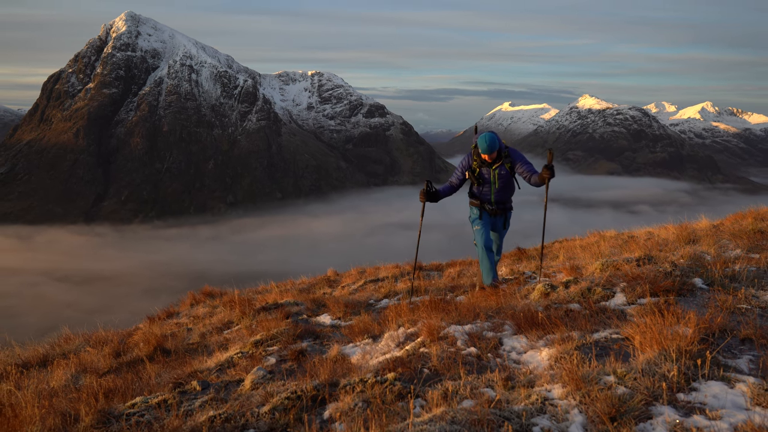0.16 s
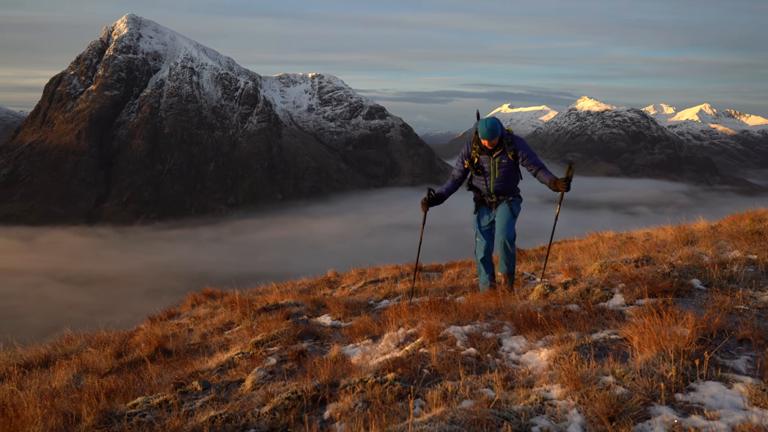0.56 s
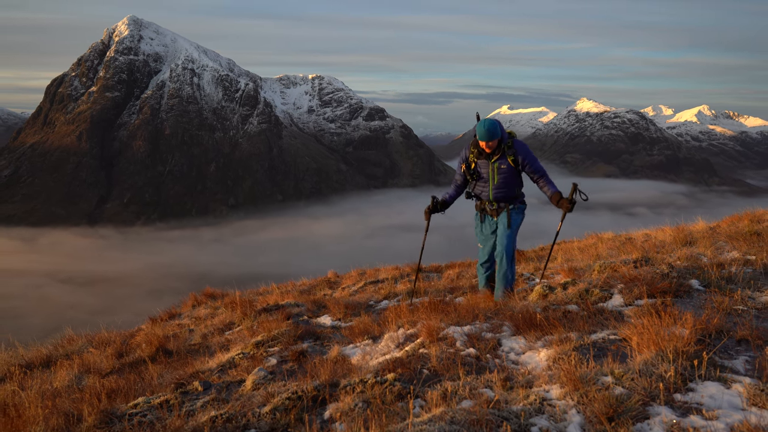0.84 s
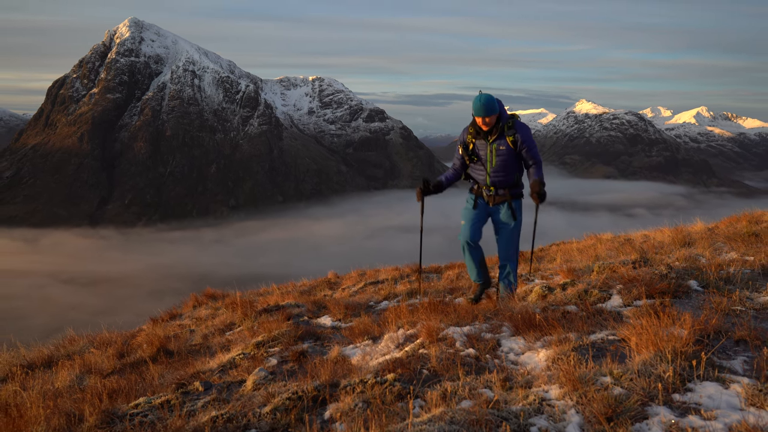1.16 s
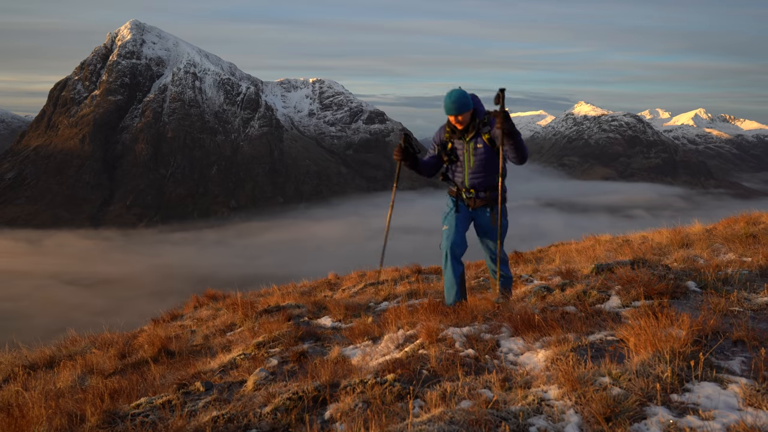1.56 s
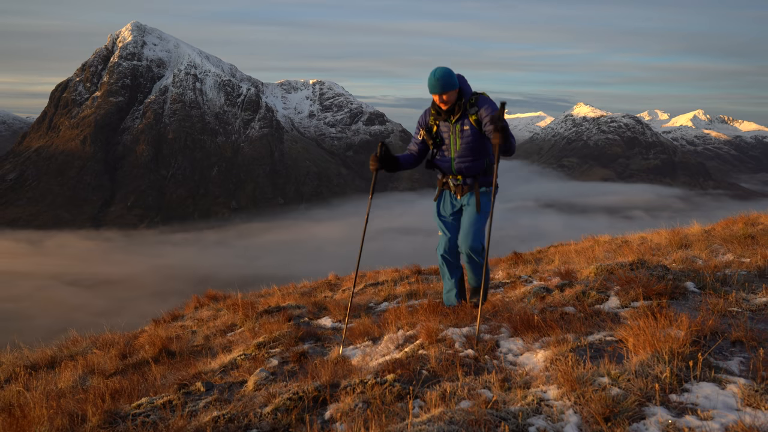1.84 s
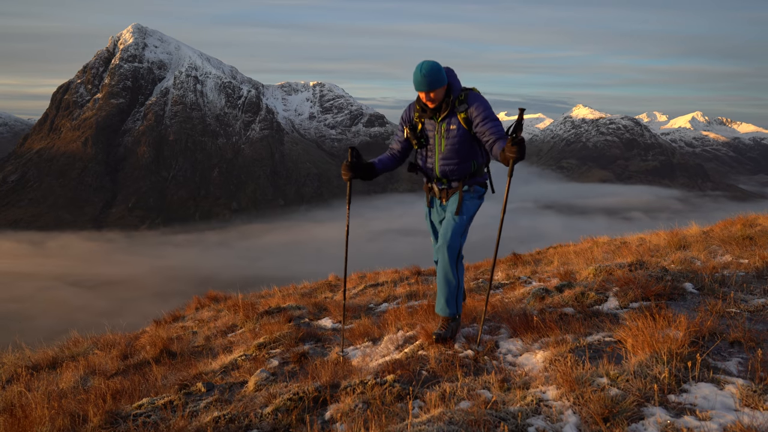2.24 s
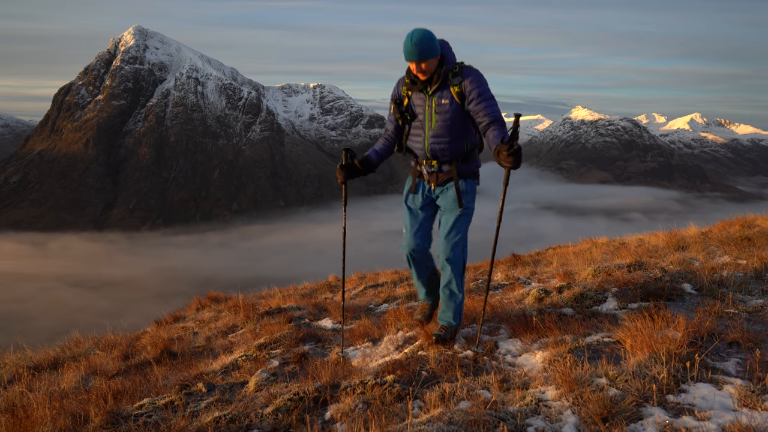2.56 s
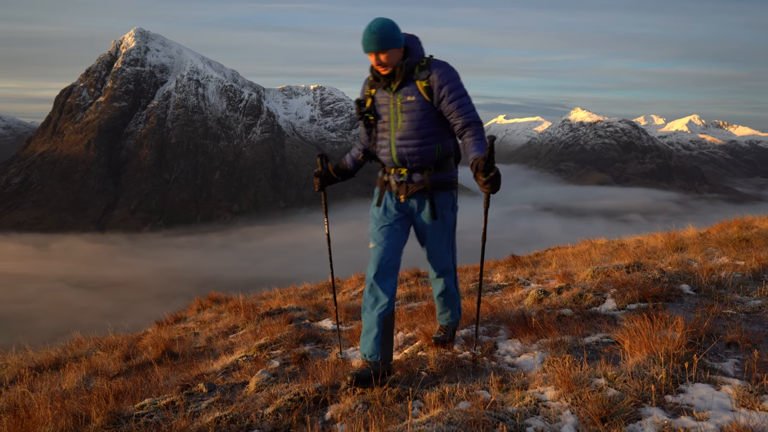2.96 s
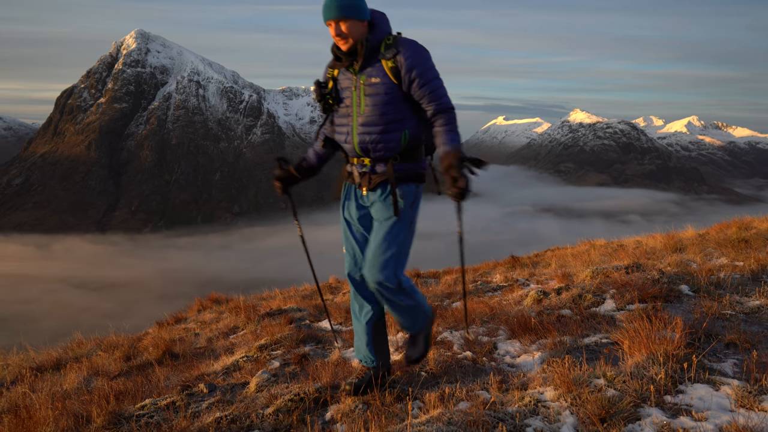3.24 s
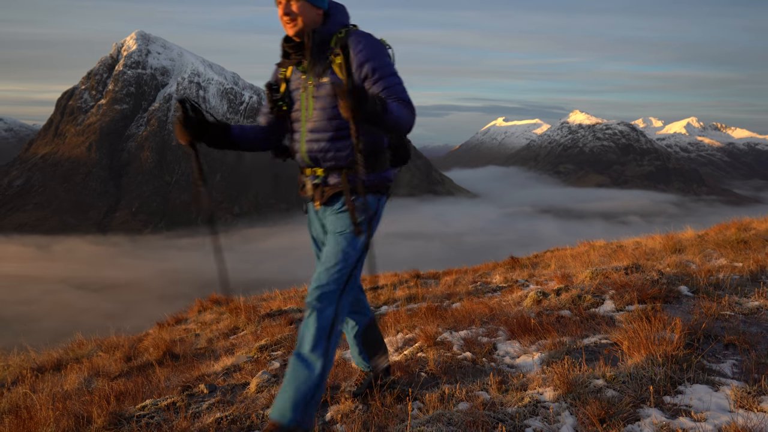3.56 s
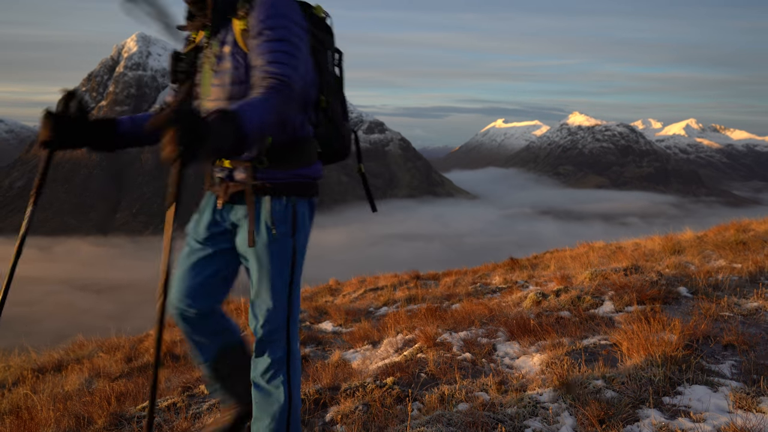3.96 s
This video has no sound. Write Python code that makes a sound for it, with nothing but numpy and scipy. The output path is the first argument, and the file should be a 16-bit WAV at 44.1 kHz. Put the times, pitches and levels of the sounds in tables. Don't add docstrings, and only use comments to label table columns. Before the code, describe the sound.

A hiker nears through brittle, icy grass with crunches, cracks and swishes, while low camera-handling rumble and creaks build to a bump and sharp ticks.

```python
import sys
import numpy as np
from scipy import signal
from scipy.fft import rfft, irfft, next_fast_len
from scipy.io import wavfile
from scipy.ndimage import map_coordinates

SR = 44100
rng = np.random.default_rng(int(sys.argv[2]) if len(sys.argv) > 2 else 0)


def makeup_ratio(level_db):
    decades = np.asarray(level_db, float) / 20
    return 10 ** decades


def transcribe(u):
    v = np.clip(np.atleast_2d(u).T, -1, 1)
    q = np.round(v * 32767).astype(np.int16)
    wavfile.write(sys.argv[1], SR, q)


N = 180501
TIME_S = np.arange(N) / SR
LEFT_RIGHT = np.array([[1], [-1]])


def unit(x):
    return x / np.sqrt(np.mean(x ** 2) + 1e-20)


def peak(x):
    return x / np.abs(x).max(axis=-1, keepdims=True)


def along(points, hz):
    f, v = np.transpose(points)
    return np.interp(np.log(hz + 1), np.log(f + 1), v)


def wobble(rate_hz):
    knots = rng.standard_normal(int(N * rate_hz / SR) + 4)
    return map_coordinates(knots, [np.arange(N) * rate_hz / SR])


def swells(rows):
    s, db, rise_s, fall_s = np.transpose(rows)[..., None]
    t = TIME_S - s
    below_db = 10 * np.where(t < 0, -t / rise_s, t / fall_s)
    return np.sqrt(np.sum(makeup_ratio(db - below_db) ** 2, axis=0))


def filtered(x, response):
    m = next_fast_len(x.shape[-1] + 4096)
    spectrum = rfft(x, m) * response(np.fft.rfftfreq(m, 1 / SR))
    return irfft(spectrum, m)[..., :x.shape[-1]]


def modes(rows):
    def response(f):
        total = 0
        for k, (hz, width, db) in enumerate(rows):
            total = total + (-1) ** k * makeup_ratio(db) * 1j * f * width / (hz * hz - f * f + 1j * f * width)
        return total
    return response


def grit(size, spike_db):
    return rng.standard_normal(size) * makeup_ratio(spike_db * np.minimum(rng.exponential(size=size), 4))


def burst(length_s, fade_s, spike_db):
    t = np.arange(SR // 16) / SR
    onset = 1 - np.exp(-t / 0.00077)
    decay = np.exp(-.5 * t / length_s - np.maximum(t - length_s, 0) / fade_s)
    return grit((3, len(t)), spike_db) * onset * decay


def struck(response):
    blow = np.zeros((3, SR // 16))
    blow[:, 8] = 1
    return peak(filtered(blow, response))


def placed(x, pan_db, scatter):
    half_pan_db = pan_db * LEFT_RIGHT / 2
    lag_samples = -.55 * half_pan_db
    direct = map_coordinates(x[0], [np.arange(x.shape[1]) - lag_samples], order=3)
    share = np.clip(scatter, 0, 1)
    return (np.sqrt(1 - share) * direct + np.sqrt(share) * x[1:]) * makeup_ratio(half_pan_db)


def add(out, s, piece):
    room = out[..., round(s * SR):][..., :piece.shape[-1]]
    room += piece[..., :room.shape[-1]]


# (time [s], left over right [dB])
WALKER_PATH = [(0, -2), (.7, -4), (1.9, -4.5), (2.2, -3.5), (3.1, -3.5), (3.45, .5), (3.7, 1), (4.0, 4),
               (4.05, 8)]


def bearing(s):
    return np.interp(s, *np.transpose(WALKER_PATH))


# (frequency [Hz], density [dB per Hz])
AIR_SPECTRUM = [(15, -55), (25, -17), (87, -2), (229, 4.5), (489, 7.5), (1020, 6), (1740, -3.5),
                (1940, 3.5), (2690, -0.5), (6050, -9.5), (7920, -21), (13600, -46), (16000, -4.5)]
# (frequency [Hz], correlation [-1..1])
AIR_LIKENESS = [(100, 0.88), (300, 1), (650, 0.33), (1400, 0.11), (8000, 0.91)]


def air():
    def mid_side(f):
        angle = np.arccos(np.clip(along(AIR_LIKENESS, f), -1, 1)) / 2
        return makeup_ratio(along(AIR_SPECTRUM, f)) * [np.cos(angle), np.sin(angle)]
    mid, side = filtered(rng.standard_normal((2, N)), mid_side)
    return makeup_ratio(-63.0) * unit(np.array([mid + side, mid - side]))


# (frequency [Hz], width [Hz], level [dB])
STREAM_BAND = [(1180, 700, 0)]


def stream():
    level_db, fade_db_per_s = -59, 6.5
    hush = unit(filtered(rng.standard_normal((3, N)), lambda f: modes(STREAM_BAND)(f) ** 2))
    return placed(hush * makeup_ratio(level_db - fade_db_per_s * TIME_S), np.zeros(N), scatter=1.0)


# (time [s], level [dB])
TURN_EFFORT = [(2.1, -110), (2.18, -53.5), (2.29, -67), (2.34, -57.5), (2.57, -52.5), (2.85, -49),
               (2.95, -50.5), (3.2, -49.5), (3.33, -46.5), (3.42, -43), (3.47, -45.5), (3.53, -42.5),
               (3.62, -43), (3.73, -48.5), (3.8, -50.5), (3.85, -41.5), (3.89, -53), (3.9, -41),
               (4.093, -42)]


def effort_db():
    return np.interp(TIME_S, *np.transpose(TURN_EFFORT))


# (frequency [Hz], width [Hz], level [dB])
PRESS_BAND = [(169, 150, 0)]


def rumble():
    press_db, grasp_s = -25.5, 3.89
    low = lambda f: 1j * f / (1.9 + 1j * f) / (1 + 1j * f / 14) ** 1.096
    push = unit(filtered(rng.standard_normal(N) * makeup_ratio(1.7 * wobble(35)), low))
    press = unit(filtered(rng.standard_normal(N), lambda f: modes(PRESS_BAND)(f) ** 2))
    skew = makeup_ratio(press_db) * press * LEFT_RIGHT * (TIME_S < grasp_s)
    return makeup_ratio(effort_db() - 1.5) * (push + skew)


# (time [s], peak [dB], push length [s], rebound [dB])
BODY_BUMPS = [
    (.033, -62, 0.0037, -22.5),
    (0.303, -64, 0.0036, -28),
    (0.504, -62, 0.0026, -25),
    (2.507, -44.5, 0.0017, -26),
    (2.573, -52, 0.0037, -32),
    (2.805, -39, 0.002, -25),
    (3.3583, -27.5, 0.0025, -31),
    (3.387, -39.5, 0.0044, -30),
    (3.898, -19.5, 0.0022, -5.5),
]


def bumps():
    out = np.zeros(N)
    for s, db, length_s, rebound_db in BODY_BUMPS:
        u = np.arange(SR // 10) / SR / length_s
        push = 1.2 * np.sin(np.pi * u ** .75) * np.exp(-.3 * u * u)
        rebound = makeup_ratio(rebound_db) * np.sin(np.pi * np.clip((u - 1.5) / 4.5, 0, 1))
        add(out, s, makeup_ratio(db) * (rebound - push))
    return out


# (time [s], crest [dB], frequency [Hz], width [Hz])
SHELL_KNOCKS = [(2.469, -51, 213, 70), (2.493, -46, 353, 70), (2.504, -47, 450, 150), (2.562, -46, 155, 70),
                (2.574, -57, 200, 90), (2.73, -47, 210, 80), (2.777, -42, 170, 60), (2.791, -44, 287, 45),
                (2.822, -49, 340, 50), (2.872, -54, 205, 80), (3.8972, -26, 1290, 1800),
                (3.898, -37, 2400, 900), (3.9011, -34.5, 307, 200), (3.928, -34, 750, 300),
                (3.967, -29, 260, 160)]


def knocks():
    out = np.zeros(N)
    for s, db, hz, width_hz in SHELL_KNOCKS:
        mode = modes([(hz, width_hz, 0)])
        ring = struck(lambda f: mode(f) / (1 + 1j * f / (2 * hz)) ** 2 / (1 + 1j * f / 4500) ** 3)
        add(out, s, makeup_ratio(db) * ring[0])
    return out


def rub(resonances, top_hz, patchy_db, leak_db):
    slips = grit((2, N), spike_db=4) * makeup_ratio(patchy_db * wobble(60))
    mid, side = filtered(slips, lambda f: modes(resonances)(f) / (1 + (f / top_hz) ** 4))
    return unit(mid + makeup_ratio(leak_db) * side * LEFT_RIGHT)


# (frequency [Hz], width [Hz], level [dB])
SHELL_MODES = [(151, 78, -5), (231, 146, -3.5), (357, 26.4, 1.5), (457, 165, -12), (700, 230, -11),
               (1250, 360, -17), (1700, 690, -16), (2200, 580, -14.5), (2930, 710, -28)]
# (time [s], level [dB], fall [s])
SKIN_SLIPS = [(2.325, -60, 0.019), (2.37, -64, .02), (2.5, -58, 0.032), (2.575, -57, 0.011),
              (2.76, -58, 0.036), (2.8, -61, 0.029), (2.96, -55, 0.18), (3.12, -61, 0.057),
              (3.33, -54.5, 0.048), (3.47, -45.5, 0.035), (3.55, -57, 0.076), (3.7, -51, 0.12),
              (3.83, -51, 0.014), (4.09, -47, .04)]


def creak():
    steady_db, follows_effort, slip_rise_s = -58, 0.93, 0.025
    steady = makeup_ratio(steady_db + follows_effort * (np.minimum(effort_db(), -48) + 50.5))
    slips = swells([(s, db, slip_rise_s, fall_s) for s, db, fall_s in SKIN_SLIPS])
    return np.hypot(steady, slips) * rub(SHELL_MODES, top_hz=2500, patchy_db=2.5, leak_db=-19.5)


# (time [s], crest [dB], rise [s], fall [s])
FINGER_DRAGS = [
    (3.8975, -25, 0.00012, 0.0042),
    (3.9, -34.5, 0.0038, 0.2),
    (4.04, -44.5, 0.17, 0.054),
]
# (frequency [Hz], width [Hz], level [dB])
GRIP_MODES = [(142, 7.4, 5.5), (247, 64, -1), (305, 23, 5), (414, 67, -9.5), (802, 140, -6.5),
              (1250, 120, -11.5), (1600, 340, -16.5), (2190, 380, -16), (3200, 670, -24)]


def drag():
    return swells(FINGER_DRAGS) * rub(GRIP_MODES, top_hz=3540, patchy_db=1.5, leak_db=-48)


def hand():
    return rumble() + creak() + drag() + bumps() + knocks()


# (time [s], crest [dB], rise [s], fall [s])
SLEEVE_STROKES = [
    (.13, -61, .2, 0.16),
    (.72, -62, .1, 0.17),
    (1.35, -70.5, 0.088, 0.043),
]
# (frequency [Hz], width [Hz], level [dB])
WEAVE_BANDS = [(9100, 900, 7), (13800, 1600, 3)]


def jacket():
    hiss = filtered(grit((3, N), spike_db=3), lambda f: modes(WEAVE_BANDS)(f) * (f / (f + 6000)) ** 2)
    return placed(swells(SLEEVE_STROKES) * unit(hiss), bearing(TIME_S), scatter=0.58)


# (time [s], crest [dB], rise [s], fall [s])
TROUSER_STROKES = [
    (3.445, -61, 0.021, 0.044),
    (3.58, -54, 0.078, 0.13),
    (3.8, -70, 0.078, 0.041),
    (3.95, -61, 0.063, 0.236),
]


def nylon():
    rubbing = grit((3, N), spike_db=8.0) * makeup_ratio(2.2 * wobble(76))
    hiss = filtered(rubbing, modes([(6000, 380, 0.5), (4000, 520, -2)]))
    return placed(swells(TROUSER_STROKES) * unit(hiss), bearing(TIME_S), scatter=0.88)


# (time [s], crest [dB], rise [s], fall [s], fizz over body [dB])
GRASS_SWEEPS = [(.12, -61.5, 0.096, 0.23, 3.5), (.7, -78.5, 0.092, 0.084, 14),
                (.78, -54.5, 0.051, 0.037, 1), (.97, -61.5, 0.13, 0.76, -12),
                (1.39, -59, 0.058, 0.046, 1.5), (1.52, -51, 0.039, 0.061, 1.5),
                (1.65, -59.5, 0.15, 0.25, -5), (1.95, -55.5, 0.12, 0.096, -4.5),
                (2.24, -56.5, 0.076, 0.16, -5.5), (2.63, -64, 0.055, 0.226, 1.5),
                (2.92, -74, 0.051, 0.085, 15), (2.945, -56, 0.023, .02, 6), (2.959, -49, 0.012, 0.034, -4),
                (3.05, -63, 0.12, 0.182, -4), (3.2, -56, 0.22, 0.086, -3.5), (3.3, -73.5, 0.127, 0.29, 6.5),
                (3.46, -63, 0.0196, 0.184, 2), (3.6, -51.5, 0.074, 0.15, -3), (3.79, -62, 0.045, .06, 2),
                (3.66, -50, 0.067, 0.04, -2), (4.01, -60.5, 0.035, 0.048, 14.5),
                (4.06, -43.5, 0.043, 0.01, 1), (4.092, -37.5, 0.0117, .02, -6)]
# (frequency [Hz], density [dB per Hz])
BODY_SPECTRUM = [(180, -32), (300, -11), (371, -12), (465, -11), (712, -7), (758, -4.5), (1100, -2),
                 (2690, -7.5), (6000, -16.5), (7800, -18.5), (13200, -120)]
# (frequency [Hz], density [dB per Hz])
FIZZ_SPECTRUM = [(1700, -19), (3000, -1.5), (5300, 1.5), (5900, 2.5), (7200, 0), (9800, 0.5), (11300, -3.5),
                 (13500, -1.5), (15700, -5.5), (16200, -4)]


def swish():
    calm_body_db, calm_fizz_db = -68, -65
    fizz_rows = [(s, db + over_db, rise_s, fall_s) for s, db, rise_s, fall_s, over_db in GRASS_SWEEPS]
    body_gain = np.hypot(makeup_ratio(calm_body_db), swells([row[:4] for row in GRASS_SWEEPS]))
    fizz_gain = np.hypot(makeup_ratio(calm_fizz_db), swells(fizz_rows))
    clumps = wobble(45)
    body_grains = grit((3, N), spike_db=3.0) * makeup_ratio(2.1 * clumps + 1.7 * wobble(150))
    fizz_grains = grit((3, N), spike_db=4.5) * makeup_ratio(2.0 * clumps)
    body = unit(filtered(body_grains, lambda f: makeup_ratio(along(BODY_SPECTRUM, f))))
    fizz = unit(filtered(fizz_grains, lambda f: makeup_ratio(along(FIZZ_SPECTRUM, f))))
    pan_db = bearing(TIME_S)
    return placed(body_gain * body, pan_db, scatter=0.25) + placed(fizz_gain * fizz, pan_db, scatter=0.95)


# (time [s], crest [dB], length [s])
BUCKLE_TICKS = [
    (4.0368, -26, 0.003),
    (4.0445, -17, 0.0016),
    (4.049, -39, 0.0012),
    (4.0555, -27, 0.003),
    (4.0603, -21, 0.0017),
    (4.084, -17.5, 0.0011),
]
# (frequency [Hz], width [Hz], level [dB])
BUCKLE_MODES = [(5750, 560, 4), (7200, 3500, -1.5), (11100, 1600, -0.5), (14200, 2300, -9),
                (2905, 890, 0.5)]


def buckle():
    out = np.zeros((2, N))
    for s, db, length_s in BUCKLE_TICKS:
        ring = filtered(burst(length_s, fade_s=0.002, spike_db=6.0), modes(BUCKLE_MODES))
        add(out, s, makeup_ratio(db) * placed(peak(ring), bearing(s), scatter=0.27))
    return out


# (time [s], crest [dB], length [s], low cut [Hz])
POLE_STRIKES = [
    (1.9183, -16.5, 0.0036, 300),
    (3.061, -37.5, 0.003, 1440),
]
# (time [s], crest [dB])
POLE_SKIPS = [
    (1.9185, -35),
    (1.9193, -21),
    (1.9203, -19.5),
    (1.9217, -26),
    (1.9228, -17.5),
]
# (frequency [Hz], width [Hz], level [dB])
SHAFT_MODES = [(491, 180, -6.5), (1080, 60, 2), (1540, 100, 4), (2296, 170, 4), (3500, 320, 4.5),
               (4200, 230, -6), (4800, 420, -12), (7330, 200, -8), (8330, 560, -6.5), (9870, 330, -13),
               (11800, 300, -20)]


def pole():
    out = np.zeros((2, N))
    for s, db, length_s, low_hz in POLE_STRIKES:
        shaft = lambda f: modes(SHAFT_MODES)(f) * (1j * f / (low_hz + 1j * f)) ** 2
        ring = filtered(burst(length_s, fade_s=0.00058, spike_db=0.0), shaft)
        add(out, s, makeup_ratio(db) * placed(peak(ring), bearing(s) - 1.8, scatter=0.16))
    for s, db in POLE_SKIPS:
        add(out, s, makeup_ratio(db) * placed(struck(modes(SHAFT_MODES)), bearing(s) - 1.5, scatter=0))
    return out


# (time [s], crest [dB], pitch [Hz], width [Hz])
CLEAN_CRACKS = [(0.525, -42.5, 1595, 300), (0.7334, -44, 1110, 500), (0.7366, -35.5, 2250, 350),
                (0.7666, -42, 1500, 900), (.769, -44, 700, 400), (0.7427, -42, 1000, 500),
                (0.763, -39, 2200, 1500), (.7657, -43, 3200, 1200), (0.7798, -44, 1000, 500),
                (0.795, -40.5, 1030, 400), (.8015, -41, 1700, 700), (.839, -50, 1000, 400),
                (1.3965, -48, 1100, 600), (1.4058, -40, 2200, 1800), (1.4085, -36, 1900, 900),
                (1.4164, -37, 1700, 700), (1.4186, -38.5, 1050, 500), (1.5019, -34, 890, 350),
                (1.4043, -43, 455, 200), (1.79, -53.5, 540, 60), (.87, -53.5, 325, 50),
                (1.5512, -39, 6200, 2500), (1.933, -34, 5700, 350), (1.9195, -32, 8600, 1200),
                (1.9335, -37, 8150, 90), (1.9425, -42, 2800, 900), (2.163, -29, 1700, 700),
                (2.166, -25, 2580, 1500), (2.1665, -37, 5200, 2000), (2.174, -29, 3000, 900),
                (2.1765, -27, 5000, 1500), (2.182, -42, 5600, 500), (2.1854, -26, 1500, 900),
                (2.1872, -28.5, 1250, 890), (2.1862, -36.5, 427, 110), (2.175, -42, 417, 150),
                (2.344, -40.5, 1410, 300), (2.551, -43.5, 2100, 900), (2.595, -44, 1190, 700),
                (2.8943, -27, 2800, 700), (2.966, -34, 6500, 900),
                (2.9002, -32, 2000, 1500), (2.9478, -42, 1200, 700), (2.9575, -41.5, 1000, 500),
                (2.963, -42, 1400, 500), (2.9764, -30.5, 4300, 2500), (3.467, -44, 780, 300),
                (3.489, -41, 820, 300), (3.648, -39, 1250, 302), (3.661, -38, 1100, 400),
                (3.829, -41.5, 800, 400), (3.0606, -34.5, 1690, 200), (3.0632, -31.5, 1500, 450),
                (3.0632, -34, 2220, 400), (3.0613, -42, 2330, 200), (3.0629, -38, 3200, 200),
                (3.0633, -40, 3480, 250), (3.2774, -42, 1000, 700), (3.897, -43, 3300, 450),
                (3.9115, -49, 3300, 500), (3.9235, -48, 3100, 500), (3.958, -48, 2100, 250),
                (4.003, -38, 10000, 3000), (4.0035, -40, 14000, 2500), (4.045, -25, 5930, 170),
                (4.0457, -24, 9000, 4000), (4.0617, -21.5, 5930, 190), (4.062, -30, 11000, 5000),
                (4.0842, -13.5, 6000, 900)]


def cracks():
    out = np.zeros((2, N))
    for s, db, hz, width_hz in CLEAN_CRACKS:
        mode = modes([(hz, width_hz, 0)])
        ring = struck(lambda f: mode(f) / (1 + 1j * f / (1.98 * hz)) ** 3)
        add(out, s, makeup_ratio(db) * placed(ring, bearing(s), scatter=0))
    return out


def stems(rows, fade_s, spike_db, spread, turf_db):
    thud_falls_db = 7.5
    out = np.zeros((2, N))
    for s, db, hz, top_db, length_s in rows:
        cluster = modes([(hz / spread, 0.28 * hz, -3), (hz, 0.52 * hz, 0),
                         (hz * spread, 0.044 * hz, -2), (hz * spread ** 2, 1.17 * hz, -3)])
        turf = modes([(450, 250, 0), (60, 100, -24)])

        def woody(f):
            return cluster(f) * 1j * f / (hz + 1j * f) / (1 + (f / (0.93 * hz * spread ** 2)) ** 6)

        def bright(f):
            return (1j * f / (3000 + 1j * f)) ** 2 / (1 + 1j * f / 11000) ** 3

        breaks = burst(length_s, fade_s, spike_db)
        wood = peak(filtered(breaks, woody))
        brittle = peak(filtered(burst(length_s, fade_s, spike_db), bright))
        thud = peak(filtered(breaks, lambda f: turf(f) / (1 + 1j * f / 900)))
        thud_db = turf_db - thud_falls_db * np.log2(hz / 1000)
        snap = wood + makeup_ratio(top_db) * brittle + makeup_ratio(thud_db) * thud
        add(out, s, makeup_ratio(db) * placed(snap, bearing(s), scatter=0.16))
    return out


# (time [s], crest [dB], pitch [Hz], length [s])
DRY_STEMS = [(0.524, -55, 1180, 0.0011), (0.861, -47, 2700, 0.0015), (1.033, -49, 1450, 0.00049),
             (1.498, -52, 880, 0.00089), (1.657, -49, 920, 0.0019), (1.701, -50, 980, 0.0016),
             (1.72, -43.5, 1880, 0.00042), (1.862, -44.5, 1630, 0.00066), (1.959, -39, 2400, .0008),
             (1.983, -42, 1800, 0.00061), (2.002, -45.5, 886, 0.0021), (2.318, -45.5, 2050, 0.0016),
             (2.345, -36.5, 1350, 0.00059), (2.55, -46, 2090, 0.00038), (2.561, -47, 2030, 0.001),
             (2.595, -48.5, 810, 0.0011), (2.615, -47.5, 2050, 0.0021), (2.729, -47, 960, 0.0012),
             (2.767, -46, 1740, 0.0015), (2.899, -38, 1640, 0.0032), (2.958, -45, 3500, .002),
             (3.0626, -39, 1550, 0.0011), (3.161, -47, 1940, 0.003), (3.275, -47, 910, 0.0014),
             (3.523, -45, 2020, 0.0017), (3.533, -39, 1040, 0.0029), (3.583, -54, 1020, .0018),
             (3.624, -36.5, 860, 0.00061), (3.683, -27.5, 1110, 0.00012)]
# (time [s], crest [dB], pitch [Hz], brittle top [dB], length [s])
ICY_STEMS = [(0.025, -46, 1990, 7, 0.00093), (0.069, -60.5, 3500, 18.5, 0.0005),
             (1.476, -52.5, 3000, 9, .012), (1.488, -62, 3000, 20, 0.0012),
             (1.549, -45, 5500, 4.5, 0.00086), (1.628, -48, 1850, 11, 0.0053),
             (1.787, -52, 850, 2.5, 0.0051), (1.9306, -32, 1500, -2, 0.0022),
             (1.938, -45, 1900, -4, 0.0044), (2.126, -46, 3500, 4, 0.00064),
             (2.186, -26.5, 1250, 0.5, 0.0015), (2.247, -49, 3500, -7, 0.0026),
             (2.676, -44.5, 2200, -3, 0.0055), (2.8957, -40, 2280, 3.5, 0.00068),
             (2.9775, -35.5, 2000, 6, 0.0015), (3.046, -46, 3500, 7, 0.0007)]


def snaps():
    dry_top_db = -15
    dry_stems = [(s, db, hz, dry_top_db, length_s) for s, db, hz, length_s in DRY_STEMS]
    return stems(dry_stems + ICY_STEMS, fade_s=0.0017, spike_db=3.0, spread=1.305, turf_db=-11.0)


# (time [s], crest [dB], pitch [Hz], brittle top [dB], length [s])
GEAR_SCUFFS = [
    (1.9187, -26.5, 1628, 1.5, 0.0025),
    (4.001, -31.5, 1940, 0.5, 0.009),
    (4.045, -30, 1487, -20, 0.0036),
    (4.0845, -23.5, 2130, -14, 0.0068),
]


def scuffs():
    return stems(GEAR_SCUFFS, fade_s=0.0086, spike_db=2.0, spread=1.506, turf_db=-18)


# (time [s], crest [dB], pitch [Hz], brittle top [dB], length [s])
BOOT_CRUNCHES = [(0, -49.5, 1060, 10, 0.031), (.728, -42.5, 1970, -1, 0.013),
                 (.7365, -41.5, 1700, -14, 0.0035), (.746, -46.5, 1150, 2, 0.027),
                 (.764, -40.5, 1510, 0.5, 0.011), (.794, -43, 1500, -4, 0.023), (.815, -47, 1054, 0, 0.033),
                 (.868, -62, 274, -25, 0.016), (1.4015, -36.5, 1145, 8, 0.0089),
                 (1.415, -40, 1250, 4.5, 0.0078), (1.497, -46, 1106, -7, 0.0306),
                 (1.524, -46, 3000, 7, 0.0058), (1.924, -38.5, 1400, -14, 0.016),
                 (2.1605, -33.5, 2500, 0, 0.0034), (2.163, -26.5, 2200, -4, 0.011),
                 (2.174, -30.5, 1560, 3, 0.012), (2.265, -39.5, 1750, 2, 0.0035),
                 (2.946, -48, 1270, -12, 0.01), (3.086, -46, 1770, -15, 0.033),
                 (3.442, -48, 900, -1, 0.019), (3.463, -45, 780, -18, 0.013),
                 (3.489, -48.5, 780, -13, 0.0038), (3.634, -39, 1406, -20, 0.032)]


def crunch():
    return stems(BOOT_CRUNCHES, fade_s=0.0093, spike_db=4.5, spread=1.507, turf_db=-9.5)


def scene():
    background = air() + stream() + hand()
    walker = jacket() + nylon() + swish() + buckle() + pole()
    return background + walker + cracks() + snaps() + scuffs() + crunch()


def band_limit(x):
    return signal.sosfilt(signal.butter(12, 15900, fs=SR, output="sos"), x)


def record(dry):
    top_hz = 15800
    mix = filtered(dry, lambda f: f < top_hz)
    return band_limit(mix)


dry = scene()
out = record(dry)
transcribe(out)
```